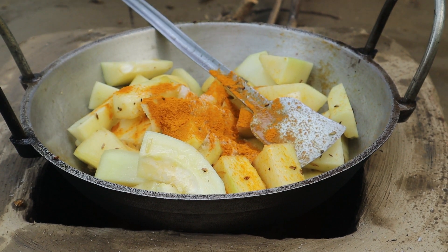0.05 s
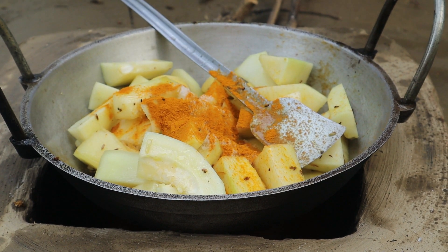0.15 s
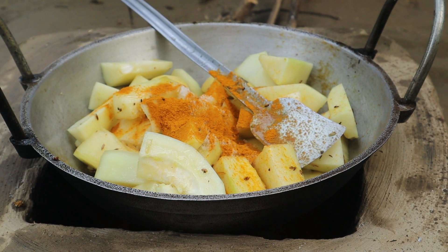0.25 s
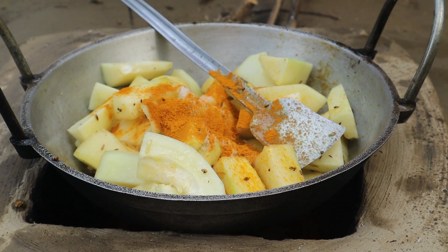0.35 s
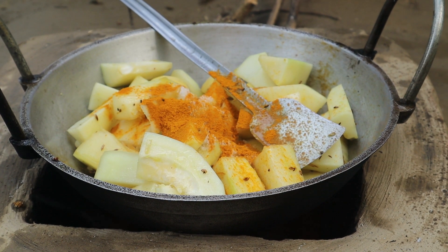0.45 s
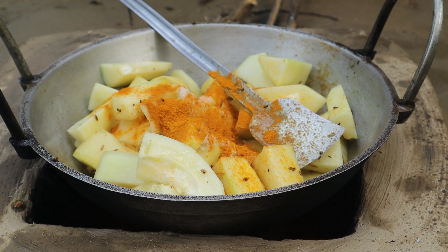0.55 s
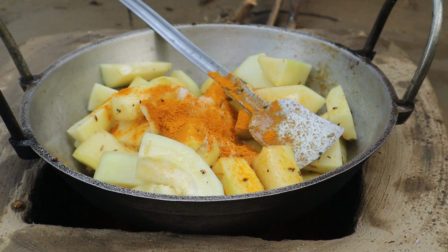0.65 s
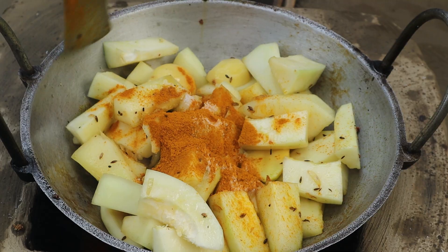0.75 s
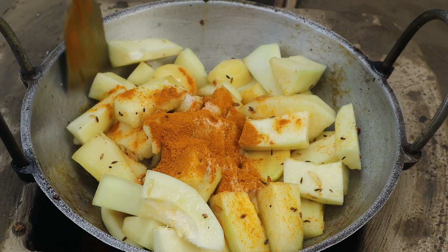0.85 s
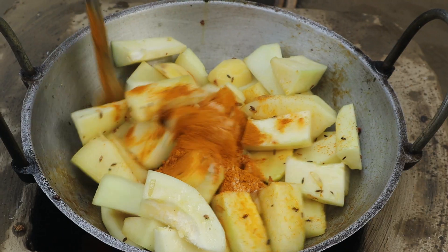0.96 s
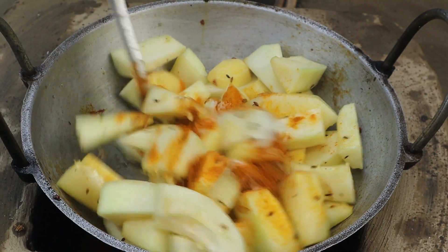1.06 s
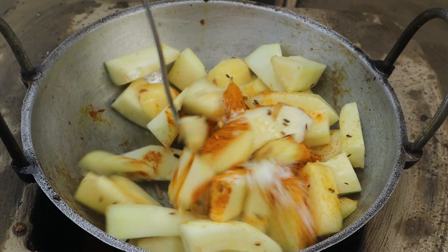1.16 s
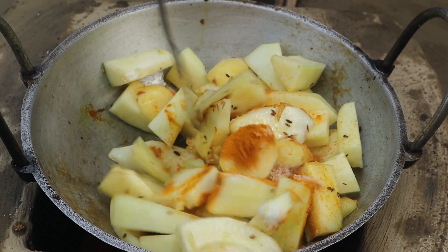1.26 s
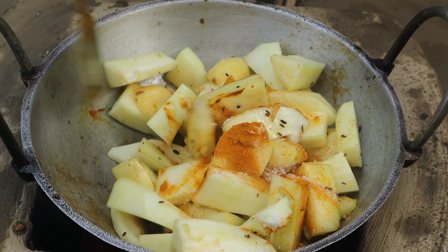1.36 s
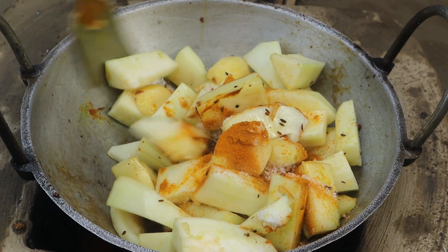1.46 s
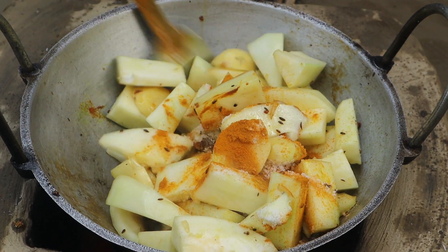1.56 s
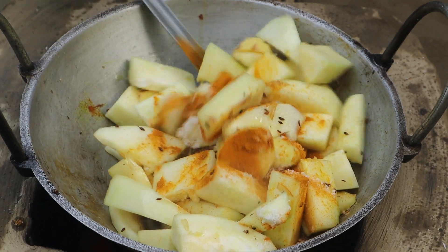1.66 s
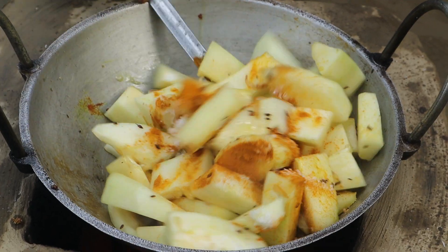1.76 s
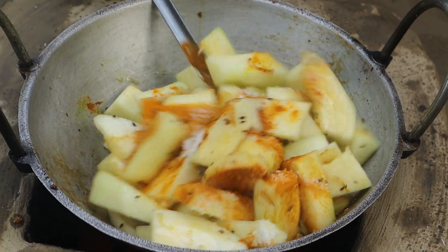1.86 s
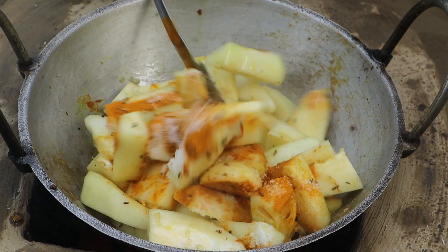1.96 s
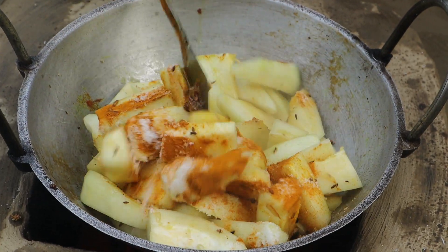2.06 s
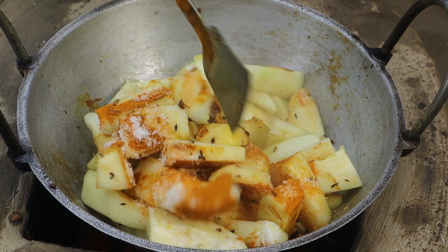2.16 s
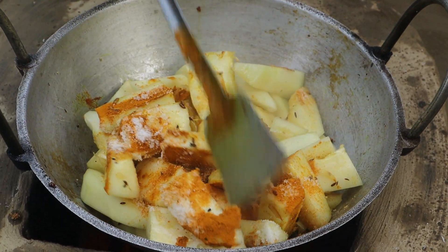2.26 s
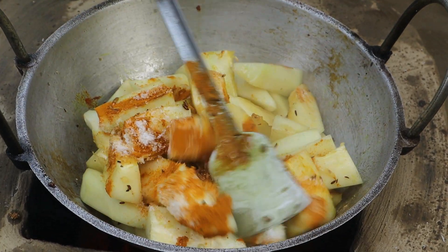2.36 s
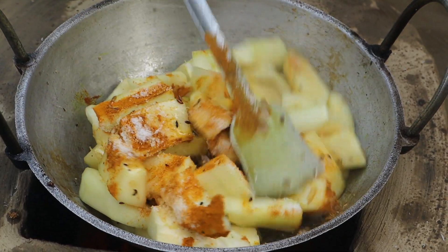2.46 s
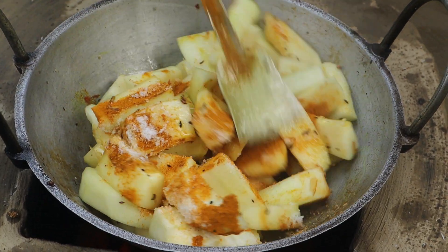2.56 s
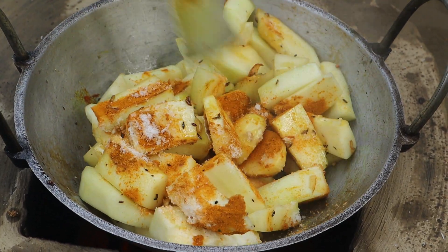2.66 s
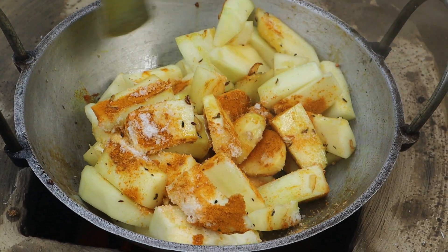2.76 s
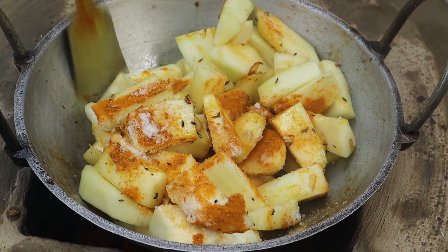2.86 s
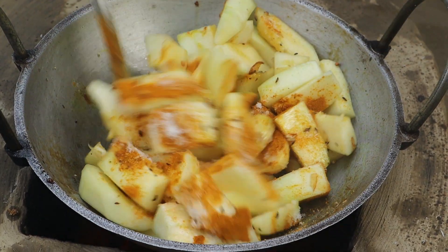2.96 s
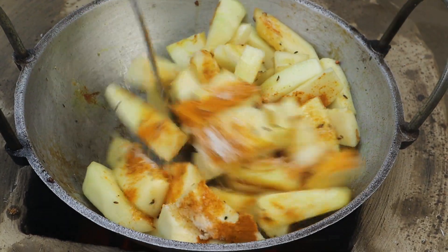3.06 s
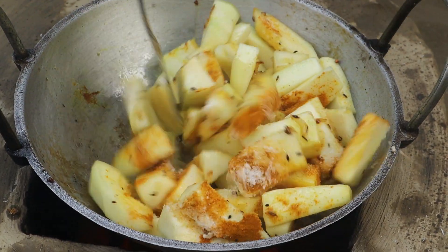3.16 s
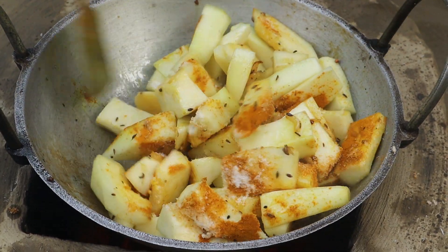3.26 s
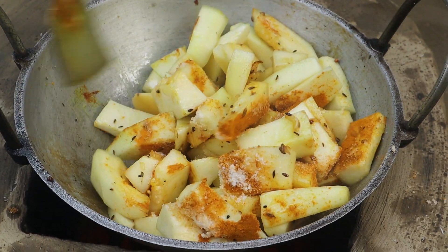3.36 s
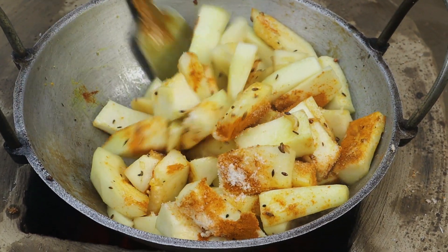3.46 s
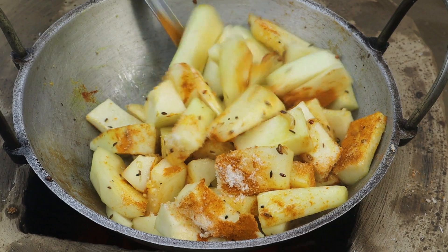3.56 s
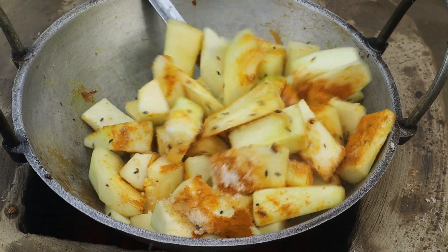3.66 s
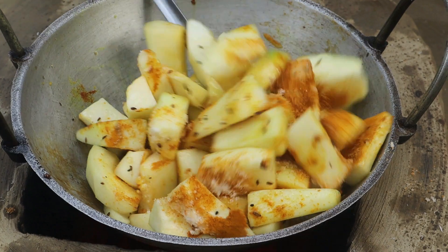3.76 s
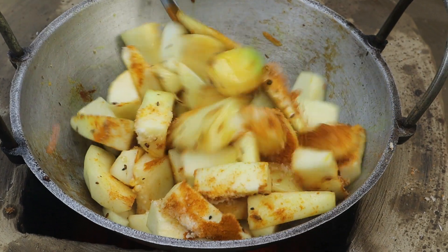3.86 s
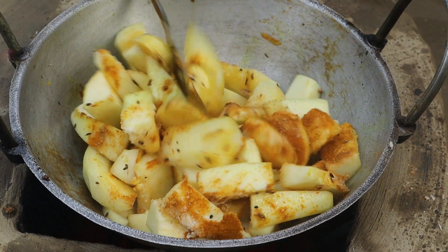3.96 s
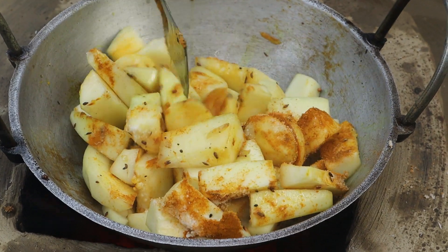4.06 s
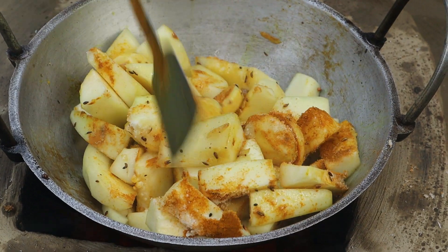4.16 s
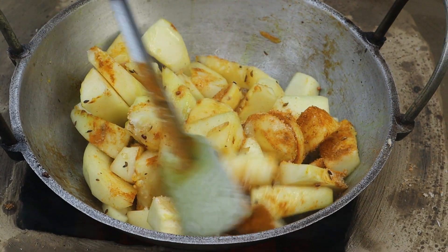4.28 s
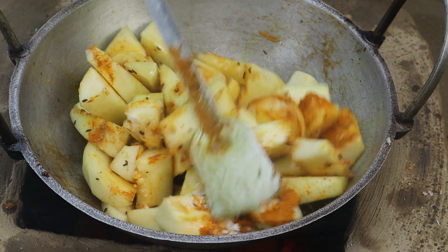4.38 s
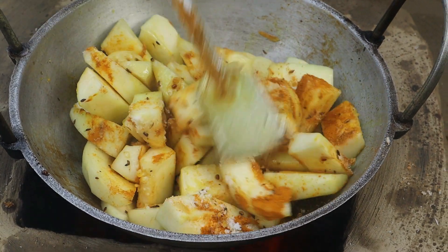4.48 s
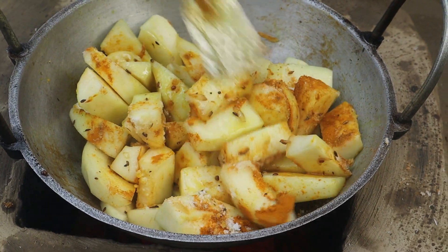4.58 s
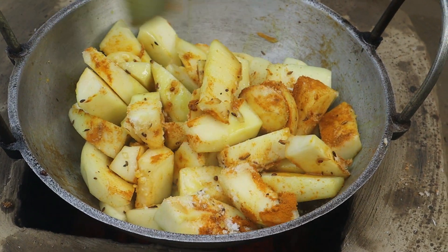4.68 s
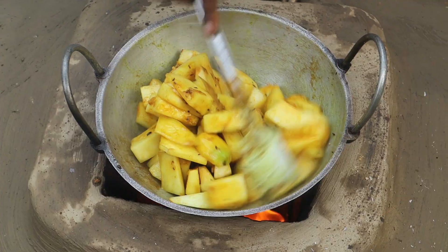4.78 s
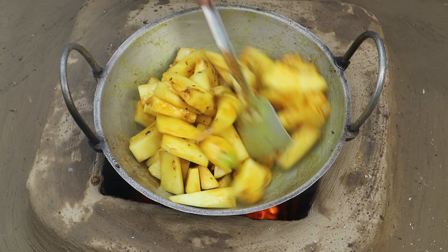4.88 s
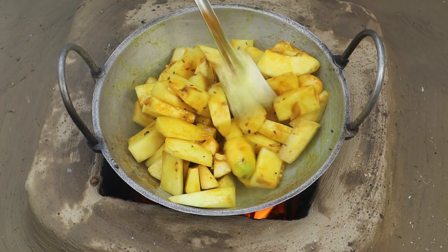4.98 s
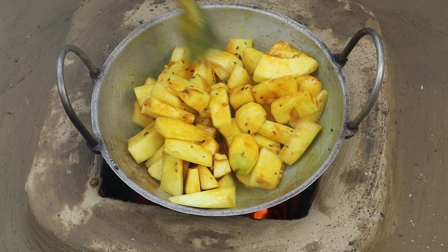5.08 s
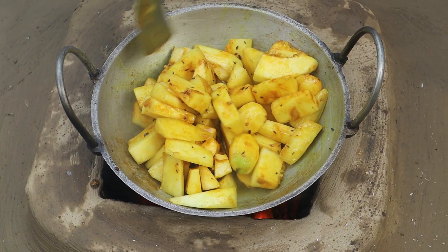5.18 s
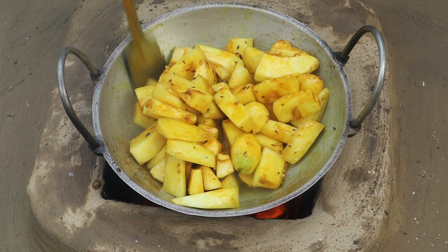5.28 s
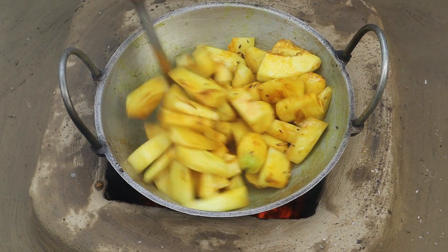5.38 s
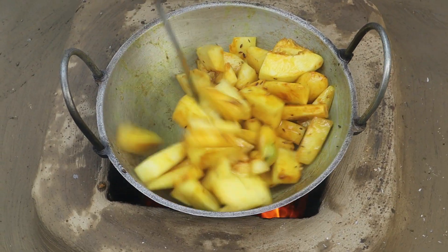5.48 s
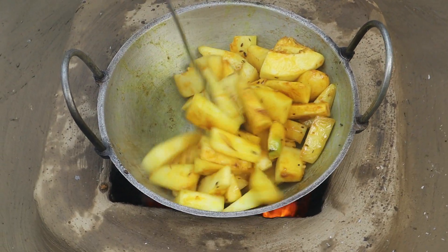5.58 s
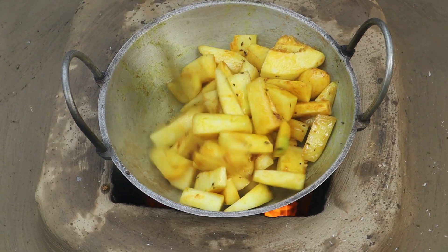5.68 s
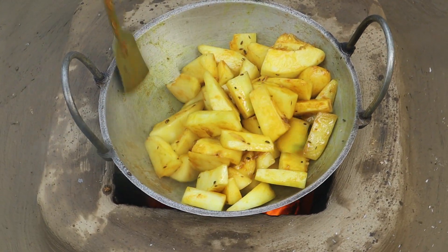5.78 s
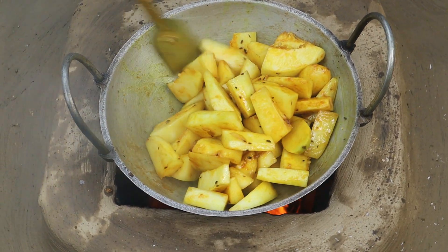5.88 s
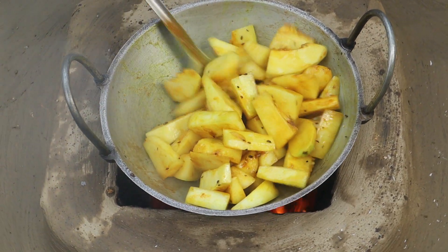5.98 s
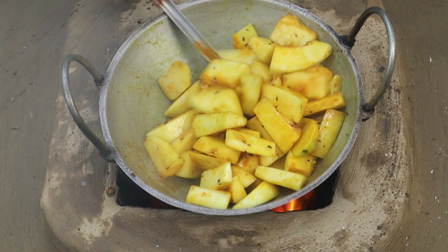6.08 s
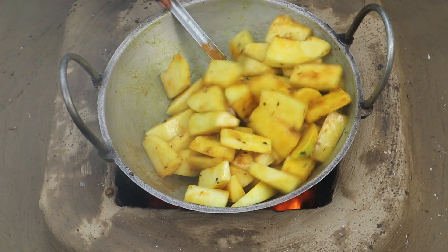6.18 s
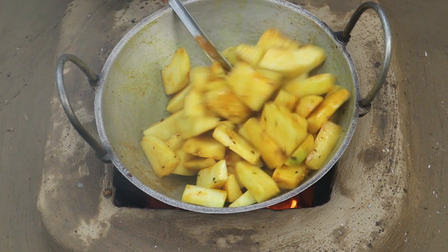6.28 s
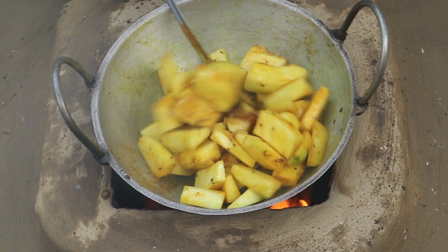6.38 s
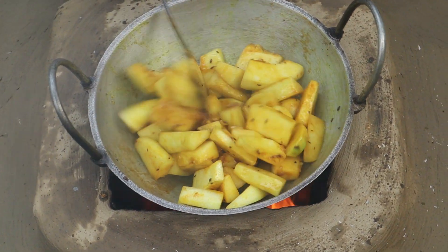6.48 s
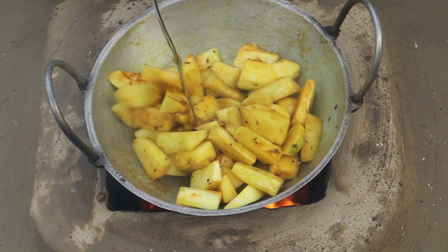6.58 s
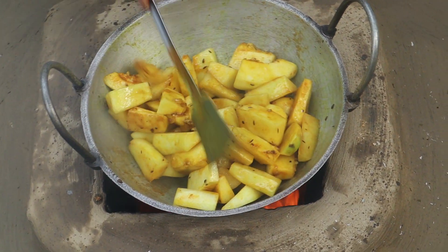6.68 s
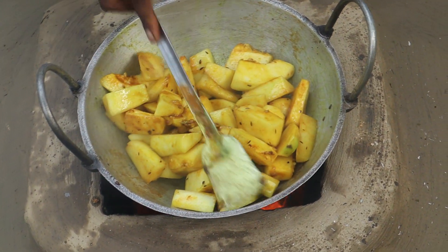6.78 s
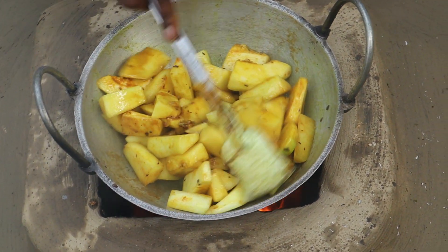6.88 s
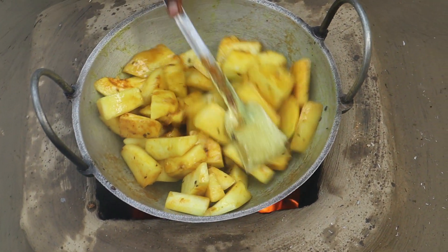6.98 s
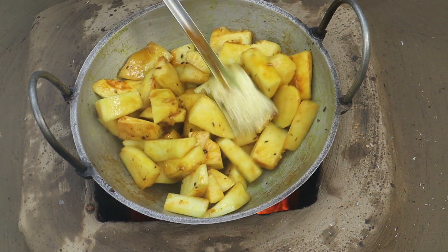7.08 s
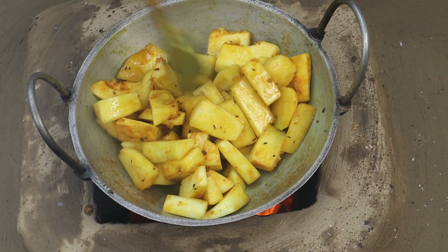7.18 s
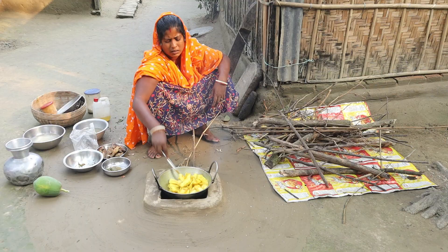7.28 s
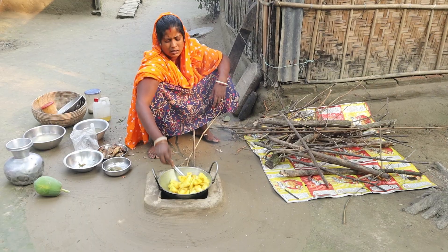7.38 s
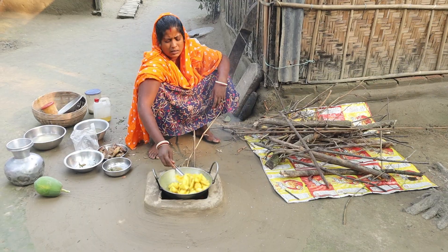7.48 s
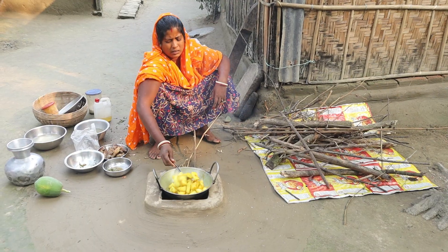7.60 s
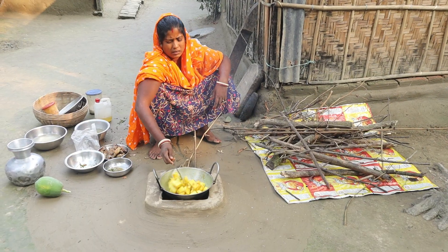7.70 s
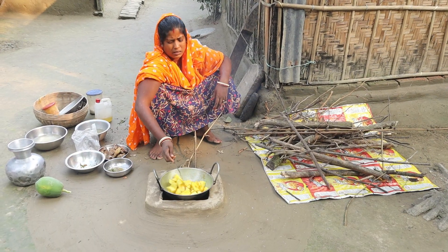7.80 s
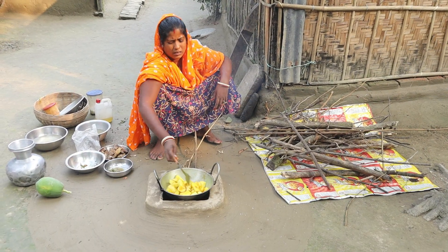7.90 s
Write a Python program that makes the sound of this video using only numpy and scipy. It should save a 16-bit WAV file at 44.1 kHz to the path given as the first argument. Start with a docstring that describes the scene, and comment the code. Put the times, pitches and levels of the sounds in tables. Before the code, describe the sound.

Stereo close microphone outdoors: faint bubbling and popping oil first, then vigorous sizzling with short metallic clacks, gritty blade scrapes and brief squeaks as vegetables are turned in a pan. A quieter lull leads to an even, dense sizzle over low rumble, with dull tumbling and sparse knocks. Finally, a wider position with quieter frying, a single clink and soft distant one-cylinder engine pulses.

```python
"""Vegetable pieces fry in oil in a round metal pan on an outdoor fire, heard from four positions in turn.
From the start, noise bands of steam bubbles seethe over a low rumble, pieces roll and big drops pop as decaying sines.
From about 1 s a spatula knocks, scrapes and squeaks: contact noise rings the pan's modes and narrow bands glide.
Faint sine hums come and go from 2.75 s, rolling pieces groan low at 6.6 s; from 7.4 s a slow one-cylinder engine
thumps far off, a ringing pulse per firing."""
import sys
import numpy as np
from scipy import signal
from scipy.fft import rfft, irfft
from scipy.io import wavfile

SR = 44100
rng = np.random.default_rng(int(sys.argv[2]) if len(sys.argv) > 2 else 0)


def wav_record(signal):
    """Record a signal, one row per channel, as 16-bit PCM in the file named by sys.argv[1]."""
    frames = np.transpose(np.atleast_2d(signal))
    bounded = np.clip(frames, -1, 1)
    # unit amplitude maps onto the largest positive 16-bit level
    quanta = np.round(bounded * 32767).astype(np.int16)
    wavfile.write(sys.argv[1], SR, quanta)


N = 350154


def amp(db):
    """Decibels to gain."""
    return 10 ** (np.asarray(db) / 20)


def rms_one(x):
    """Scale to unit rms."""
    return x / np.sqrt(np.mean(x ** 2) + 1e-20)


def in_time(tables):
    """Columns of successive curve tables, read at every sample."""
    s, *columns = np.transpose(np.vstack(tables))
    return [np.interp(np.arange(N) / SR, s, column) for column in columns]


def at_hz(points, hz):
    """The second column of a spectrum, read on a log-frequency axis."""
    points = np.array(points, float)
    return np.interp(np.log(hz), np.log(np.maximum(points[:, 0], 1)), points[:, 1])


# The start of each listening position, in seconds.
POSITION_STARTS = [0, .803, 4.804, 7.34]


def at_position(values):
    """One value for each listening position, read at every sample."""
    position = np.searchsorted(POSITION_STARTS, np.arange(N) / SR, side="right") - 1
    return np.asarray(values)[position]


def drift(rate_hz):
    """Slow random curve of spread 1: noise through two equal one-pole lowpasses, one point every 40 samples."""
    r = np.exp(-2 * np.pi * rate_hz * 40 / SR)
    noise = rng.standard_normal(N // 40 + 2002)
    slow = signal.lfilter([1], [1, -2 * r, r * r], noise)[2000:]   # skip the filter's start
    return np.interp(np.arange(N) / 40, np.arange(len(slow)), rms_one(slow))


def band_pass(x, low_hz, high_hz, order):
    """Keep one band of a sound."""
    return signal.sosfilt(signal.butter(order, [low_hz, high_hz], "band", fs=SR, output="sos"), x)


def ring(force, hz, t60):
    """A damped resonance: a unit click sets a sine of height 1 ringing."""
    r, w = amp(-60 / (t60 * SR)), 2 * np.pi * hz / SR
    return signal.lfilter([0, np.sin(w)], [1, -2 * r * np.cos(w), r * r], force + 1e-18)


def sides(db):
    """Left and right gains for a left-right difference."""
    return amp(np.multiply.outer([.5, -.5], db))


def favour(hz, centre_hz, octaves):
    """Bell curve over pitch: 1 at the centre, falling off with distance in octaves."""
    return np.exp(-.5 * (np.log2(hz / centre_hz) / octaves) ** 2)


def bursts(per_s, uneven_db):
    """Random clicks of uneven size and either sign; rms 1."""
    sizes = amp(uneven_db * np.minimum(rng.exponential(1, N), 5)) * rng.choice([-1, 1], N)
    return rms_one(sizes * (rng.random(N) < per_s / SR))


SETTLE_S, STIR_FOLLOWS = 0.12, 0.54   # time constant of settling; share of a knock's dB that sets its jolt
HARD_KNOCK_DB, HARD_THUD_DB = -19.5, -17.5   # knocks this hard stir the food fully; weaker ones less


def stirred(knock_db, hard_db):
    """How much the food is moving, 0 to 1: a jolt at each knock, then settling."""
    kicks = np.zeros(N)
    kicks[[round(row[0] * SR) for row in KNOCKS]] = amp(STIR_FOLLOWS * (knock_db - hard_db))
    settling = signal.lfilter([1], [1, -np.exp(-1 / (SETTLE_S * SR))], kicks + 1e-18)
    return np.minimum(settling, 1)


# How the pair of ports hears the frying from close by, then from further off.
# Each row: pitch in Hz, left-right likeness from 0 to 1, phase in radians by which the left leads.
PORTS = [
    [(400, 0.85, 0), (1000, .91, 0.14), (2000, 0.84, 0), (2800, 0.49, 1.1), (4100, 0.37, 0.68),
     (5500, 0.39, 1), (7000, 0.27, 0.3), (8700, 0.52, 0.1), (10000, 0.1, -2.4), (11500, 0.23, -2),
     (14000, 0.4, -4)],
    [(400, 0.87, 0.5), (1000, 0.91, 0.1), (2000, 0.88, -1.4), (2800, 0.46, 0.2), (4100, 0.43, -0.7),
     (5500, 0.58, 0.8), (7000, 0.5, 0.5), (8600, 0.46, -1.3), (10000, 0.17, 0.2), (11500, 0.24, -0.5),
     (14000, .16, -2.1)],
]
# Which of the two holds at each position: 0 close, 1 further off.
FAR = [0, 0, 1, 1]


def port_lead(left):
    """The left port hears each pitch a little early or late, differently from near and far."""
    hz = np.fft.rfftfreq(N, 1 / SR) + 1
    leads = [at_hz(np.array(rows)[:, ::2], hz) for rows in PORTS]
    near, far = [irfft(rfft(left) * np.exp(1j * lead), N) for lead in leads]
    return np.where(at_position(FAR), far, near)


# Level of the frying, one table a position. Each row: time in seconds, sizzle in dB before the final gain,
# lower bubbles above it in dB, treble above it in dB.
FRYING = [
    [(0.0, -39.5, -4, 1), (.09, -47.5, 4, 8), (.18, -42.5, 4, 3.5), (.26, -47.5, 2.5, 7),
     (.4, -38, -3.5, -9.5), (.48, -46, 6, 1.5), (.56, -45.5, 2, 5), (.64, -39, 0.5, 3), (0.8, -42, -2.5, 4)],
    [(0.803, -35.5, 1, 5), (1.0, -34.5, -1.5, 4.5), (1.2, -31.5, -5.5, 1.5), (1.38, -28.5, -3.5, 0),
     (1.55, -31.5, -2, 2.5), (1.75, -23, -8.5, 0), (1.86, -30, -3, 3.5), (1.95, -26.5, -9, -1.5),
     (2.08, -34, 2, 5.5), (2.23, -29.5, -5, -4), (2.33, -30, -3, 2.5), (2.48, -26.5, -5.5, -4.5),
     (2.63, -27, -5, -3), (2.78, -28, 0, -2.5), (2.95, -30.5, -2, 5.5), (3.08, -31, -2, 7),
     (3.16, -34, -1.5, 8), (3.23, -36, -2, 9.5), (3.3, -29, -11, -6), (3.42, -35, 0, -1.5),
     (3.5, -34.5, -0.5, 1), (3.68, -25, -8, 1.5), (3.8, -33.5, -2.5, 6.5), (3.88, -34, -8, 2),
     (3.95, -34.5, -15, -5), (4.05, -39.5, -10.5, 0.5), (4.13, -45.5, -6.5, 5), (4.23, -39, -9.5, 1),
     (4.32, -44, -12, 2), (4.41, -41, -6, -4.5), (4.44, -42, 10, 2), (4.49, -41.5, 4.5, 0),
     (4.58, -34.5, -6.5, -6), (4.72, -37, -12, -7), (4.8, -37, -8, 1)],
    [(4.804, -28.5, -4, 0), (5.12, -28, -6, 0.5), (5.43, -28.5, -6, -0.5), (5.6, -30.5, -3.5, -1.5),
     (6.05, -29.5, -4, 2), (6.3, -30, -4, 4), (6.53, -31, -4.5, 2.5), (6.85, -28, -4.5, 2),
     (7.15, -29.5, -2.5, 3.5), (7.32, -30, -3.5, 1)],
    [(7.34, -30.5, -1, 4), (7.58, -39.5, -0.5, 2), (7.94, -40.5, 2, 2.5)],
]
# Colour of the frying, one table a position. Each row: time in seconds, extra gurgle in dB,
# extra level near BODY_HZ in dB, extra level near HOLLOW_HZ in dB, extra mist in dB.
COLOUR = [
    [(0.0, 2, -4, -.5, -8), (.4, 4, -3.5, 6, -1), (.8, 2, -6, 1, -5.5)],
    [(.803, 0, 0, 0, -2.5), (1.3, 0.5, 0.5, 3, 2.5), (1.7, -3.5, -1.5, -0.5, -0.5), (2.1, -0.5, 2, -2, 0.5),
     (2.45, -5.5, 1, -7, 2), (2.8, 0, -3, -0.5, 4), (3.1, -1.5, -1.5, 1, 1.5), (3.45, -7, -6, -3.5, 5.5),
     (3.65, -0.5, -1.5, 0, -4), (3.85, 0, -5.5, -7, -7.5), (4.1, 3, 4.5, 3, 3), (4.45, 4.5, -2, 2, 5.5),
     (4.8, -1, 0, -4, 0)],
    [(4.804, -2, 0, -2, -0.5), (5.3, -1, 2, -1.5, 1.5), (5.8, -0.5, 1.5, -1, 0.5), (6.3, 1.5, -2, 0.5, 0),
     (6.8, -3, 1.5, -1.5, -3.5), (7.32, 2, 3, 0, 0)],
    [(7.34, -3, -0.5, -5, -12), (7.6, -1, -0.5, 1.5, -5), (7.94, -2.5, -1, 1, -5)],
]
# Pitches that mark the kinds of bubble, in Hz.
BUBBLE_HZ = [1000, 1350, 1800, 3100, 6600, 11500]
# The kind at each of those pitches: 0 gurgle, 1 simmer, 2 sizzle, 3 spit, 4 mist.
BUBBLE_KIND = [0, 1, 1, 2, 3, 4]
# Usual share of each kind in steady frying, in dB.
USUAL_DB = [0.5, 2, 1.5, -0.5, 3]
# Basic spectrum of the frying. Each row: pitch in Hz, relative density in dB.
SIZZLE = [(300, -40), (450, -26), (620, -16), (820, -11.5), (1050, -10), (1250, -7), (1550, -5.5),
          (2000, -4.5), (2600, -4), (3100, -4), (3600, -4.5), (4200, -3.5), (4800, -9), (5700, -8),
          (7000, -9.5), (9000, -11.5), (11600, -9.5), (13000, -16), (15600, -24.5)]
# Stereo lean of the frying by pitch. Each row: pitch in Hz, extra left-right difference in dB.
LEAN = [(400, -0.5), (1000, 3), (2000, -3.5), (4000, -1.5), (8000, 4), (14000, 1)]
# Left-right balance of the frying at each position, in dB.
LEAN_DB = [-2, -1.5, -2.15, -0.5]
BODY_HZ, HOLLOW_HZ = 2240, 2800
GURGLE_FOLLOWS, FULL_BASS_DB = 0.35, -45   # share of the bass swing; bass level from which the swing counts
STIRRED_DB, STIRRED_SIMMER_DB = 7, 2   # rise of gurgle and simmer when fully stirred
FULL_SIZZLE_DB, PATCHIER_PER_DB = -32, 0.1265   # below this sizzle the sound grows patchier, by this share per dB


def bubble_shares():
    """Level of each kind of bubble in dB over time; knocks stir up gurgle and simmer."""
    sizzle_db, simmer_db, treble_db = in_time(FRYING)
    more_gurgle_db, _, _, more_mist_db = in_time(COLOUR)
    moving = stirred(np.transpose(KNOCKS)[1], HARD_KNOCK_DB)
    gurgle_db = GURGLE_FOLLOWS * (in_time(BASS)[0] - FULL_BASS_DB) + STIRRED_DB * moving
    gurgle_db = gurgle_db + 0.5 * simmer_db + more_gurgle_db
    simmer_db = simmer_db + STIRRED_SIMMER_DB * moving
    kinds = [gurgle_db, simmer_db, 0 * sizzle_db, treble_db, treble_db + more_mist_db]
    return np.array(kinds) + np.c_[USUAL_DB]


def frying(fine_per_s, uneven_db, spatter_db, patchy_db, gain_db):
    """Bubbles of each size fill their own narrow band; sparse spatter clicks through all of them."""
    sizzle_db = in_time(FRYING)[0]
    _, body_db, hollow_db, _ = in_time(COLOUR)
    shares = bubble_shares()
    swarms = [bursts(fine_per_s, uneven_db) for swarm in range(3)]
    spatter = amp(spatter_db) * bursts(900, 4.0)
    place = rng.standard_normal(N)      # each bubble bursts somewhere else across the pan
    far = at_position(FAR)
    seething = drift(7.3)               # shared by all bands
    patchy = patchy_db * (1 + PATCHIER_PER_DB * np.maximum(FULL_SIZZLE_DB - sizzle_db, 0))
    out = np.zeros((2, N))
    edges = np.geomspace(420, 16500, num=22)
    for k, (low, high) in enumerate(zip(edges, edges[1:])):
        hz = np.sqrt(low * high)
        clicks = swarms[k % 3] + spatter
        mid, side = band_pass([clicks, clicks * place], low, high, 3)
        alike = np.clip([at_hz(rows, hz) for rows in PORTS], 0, 1)[far]
        # weight of each kind of bubble in this band
        nearness = [at_hz(list(zip(BUBBLE_HZ, own)), hz) for own in np.eye(5)[:, BUBBLE_KIND]]
        db = at_hz(SIZZLE, hz) + nearness @ shares
        db = db + favour(hz, HOLLOW_HZ, 0.12) * hollow_db + favour(hz, BODY_HZ, 0.17) * body_db
        db = db + patchy * (0.5 * seething + drift(15.0)) + 0.47 * drift(1.43)
        pair = np.sqrt(1 + alike) * mid + np.sqrt(1 - alike) * side * [[1], [-1]]
        out += amp(db) * sides(at_hz(LEAN, hz))[:, None] * pair
    return amp(sizzle_db + gain_db) * sides(at_position(LEAN_DB)) * [port_lead(out[0]), out[1]]


# Spectrum of the rumble. Each row: pitch in Hz, relative density in dB.
RUMBLE_COLOUR = [(13, -47), (22, 7), (48, 3.5), (75, 5.5), (129, -1), (183, 3.5), (280, -6.5), (413, -16.5),
                 (600, -7.5), (780, -4.5), (1320, -120)]
# Level of the bass, one table a position; rumble, rolling pieces and gurgle all follow it.
# Each row: time in seconds, relative level in dB, deepest rumble above its usual share in dB.
BASS = [
    [(0.0, -65, -3), (0.4, -69.5, -2), (0.6, -74, -3), (0.8, -77, 0)],
    [(0.803, -47.5, 2), (1.0, -43.5, -4), (1.4, -43.5, -7), (1.8, -44, -16), (2.05, -47, -5),
     (2.4, -68, -5), (2.65, -61, -6), (2.85, -66, -8), (3.0, -53, -1), (3.4, -70, -4), (3.6, -59, -8),
     (3.85, -69, -9), (4.0, -54, -9), (4.2, -85, -5), (4.5, -67, -6), (4.8, -93, 0)],
    [(4.804, -44.5, 0), (5.0, -46, 7), (5.2, -46, 3), (5.6, -44.5, -2), (6.16, -43, -1), (6.35, -45.5, 1),
     (6.65, -44, 2), (7.32, -49, 4)],
    [(7.34, -42.5, 2), (7.94, -47.5, 4)],
]
DEEP_HZ = 72   # below this the rumble is the deepest


def rumble(lumpy_db):
    """Low noise of the fire and the surroundings, less alike on the two sides as pitch rises."""
    hz = np.fft.rfftfreq(N, 1 / SR)
    colour = amp(at_hz(RUMBLE_COLOUR, hz + 1))
    mid, side = irfft(rfft(rng.standard_normal((2, N))) * colour, N)
    rising_side = signal.lfilter([1, -1], 1, rms_one(side))   # a difference favours higher pitches
    low = rms_one(mid) + amp(12.0) * rising_side * [[1], [-1]]
    bass_db, deep_db = in_time(BASS)
    deep = signal.sosfiltfilt(signal.butter(2, DEEP_HZ, fs=SR, output="sos"), low)
    return amp(bass_db + lumpy_db * drift(3.7)) * (low - deep + amp(deep_db) * deep)


# Pieces rolling on the bowl under full bass, before any stirring: level at each position, in dB.
TUMBLING_DB = [-68, -57, -56.5, -60]
TUMBLING_FOLLOWS, ROLLING_DB = 0.79, 13   # share of the bass swing; rise of the rolling after a hard thud


def tumbling():
    """Soft pieces bump the bowl in loose clusters: dull thuds in a narrow low band."""
    bumps = bursts(2000, 2.9) * (1 + 0.6 * rng.standard_normal((2, N)))
    dull = band_pass(bumps, 220, 480, 3)
    db = at_position(TUMBLING_DB) + TUMBLING_FOLLOWS * (in_time(BASS)[0] - FULL_BASS_DB)
    db = db + ROLLING_DB * stirred(np.transpose(KNOCKS)[4], HARD_THUD_DB)
    return amp(db) * rms_one(dull)


# Big drops bursting. Each row: time in seconds, peak in dB before the band filter, pitch in Hz,
# left-right difference in dB.
POPS = [(.0255, -21.5, 6800, 0), (.04, -30, 4000, 0), (.087, -29, 3660, -2), (.108, -32, 1490, -2),
        (.1675, -28, 2600, -3), (.19, -27, 2300, -5), (.208, -25, 5300, 0), (.3165, -23.5, 2900, -7),
        (.3516, -23, 2820, -4.5), (.3765, -21, 2110, -7), (.424, -25, 4070, -4), (.4582, -28, 1700, -2),
        (.478, -24, 2050, -6), (.503, -17, 9550, 13), (.507, -27, 3300, 0), (.58, -27, 4020, 0),
        (.596, -23, 7300, 3), (.602, -24, 3950, -1), (.6217, -25, 3500, -1), (.6655, -27, 3630, -2),
        (.6872, -23, 3500, -1), (.69, -27, 2600, -2), (.6905, -32.5, 1400, -2), (1.195, -19, 4350, -1),
        (1.215, -19, 1760, -2), (1.362, -18, 3100, -4), (1.4209, -4, 11500, 2), (1.858, -13, 4250, -2),
        (1.8888, -22, 3300, -3), (1.897, -15, 9500, 1), (1.9178, -16, 3700, 0), (1.983, -15, 7500, -1),
        (2.003, -23, 3900, -1), (2.0503, -9, 11500, -2), (2.055, -8, 8000, 0), (2.0656, -11, 6040, -1),
        (2.0658, -3, 11800, -1), (2.088, -23, 3000, -1), (2.1255, -20, 3800, -3), (2.1487, -21, 4030, -1),
        (2.1878, -12, 8500, -6), (2.206, -17, 8000, -1), (2.224, -18, 12000, -2), (2.2411, -11, 8000, -4),
        (2.249, -16, 3000, -2), (2.265, -23, 11000, -2), (2.284, -14, 8000, -1), (2.31, -8, 9130, -4),
        (2.32, -17, 11000, -2), (2.3315, -10, 9000, -1), (2.3492, -6, 10770, -5), (2.4505, -15, 4180, -3),
        (2.5545, -20, 2200, -3), (2.6, -19, 2820, -2), (2.77, -10, 3730, -2), (2.8316, -10.5, 7800, 1),
        (3.1277, -14, 8400, -1), (3.1346, -5, 10000, -1), (3.1395, -14, 10000, 2), (3.1465, -15, 9000, 0),
        (3.16, -14, 6500, 0), (3.1732, -13, 10000, 0), (3.1755, -10, 10500, 0), (3.178, -18, 6000, -1),
        (3.1888, -9, 8500, -1), (3.2127, -7, 8000, -1), (3.228, -16, 10500, 0), (3.2325, -10, 10000, 0),
        (3.262, -17, 9000, 0), (3.276, -16, 3480, -4), (3.281, -19, 10500, 0), (3.293, -24, 3800, 0),
        (3.33, -25, 3650, -3), (3.569, -7, 10000, 0), (3.59, -15, 11500, 0), (3.598, -7, 11500, 0),
        (3.671, -17, 3500, 0), (3.772, -20, 11000, 0), (3.8007, -19, 3700, -2), (4.012, -35, 1600, -2),
        (4.196, -30, 2600, -2), (4.21, -25, 2700, -2), (4.233, -32, 2850, -2), (4.282, -36, 2900, -2),
        (4.315, -31, 2800, -2), (4.598, -27, 2680, -3), (4.618, -25, 3340, 0)]
# Chance drops per second at each position.
SMALL_POPS_PER_S = [25, 8, 3, 6]
SMALL_POP_DB = 1   # the strongest chance drop above the sizzle table; others reach down 10 dB below it
POP_CYCLES, SMALL_POP_CYCLES = 5, 6.2   # ringing length of drops up to POP_HZ
POP_HZ, POP_SHORTENING = 3500, .85   # above this pitch drops ring ever fewer cycles, by this power


def pops():
    """Each big drop is a click that rings a few cycles; smaller bubbles come by chance and ring longer."""
    when, keep, size, pitch, place = rng.random((240, 5)).T
    at = (when * N).astype(int)
    small_db = in_time(FRYING)[0][at] + SMALL_POP_DB - 10 * size
    small = np.c_[at / SR, small_db, 1300 * 7.5 ** pitch, 8 * place - 6]
    small = small[keep < at_position(SMALL_POPS_PER_S)[at] * N / SR / len(at)]
    out, t = np.zeros((2, N + 600)), np.arange(600) / SR
    for rows, most in (POPS, POP_CYCLES), (small, SMALL_POP_CYCLES):
        for s, db, hz, lean_db in rows:
            cycles = most * min(POP_HZ / hz, 1) ** POP_SHORTENING
            swell = np.exp(-t * hz * 2 / cycles) * np.tanh(t * hz * 9 / cycles)
            wave = np.sin(2 * np.pi * hz * t) * swell
            out[:, round(s * SR):][:, :600] += amp(db) * sides(lean_db)[:, None] * wave / np.abs(wave).max()
    return band_pass(out[:, :N], 900, 14000, 3)   # too small for bass


def contact_force(contact, shake):
    """A first touch, then chatter for as long as the contact lasts."""
    t = np.arange(len(shake)) / SR
    fading = np.exp(-(t / max(contact, .0005)) ** 3)
    return 0.29 * (t == 0) + shake * fading / np.sqrt(np.sum(fading ** 2))


# Blade sliding over the metal. Each row: hardest moment in seconds, build-up in seconds, easing in seconds,
# drive in dB, favoured pitch at start in Hz, at end in Hz, bowl rasp in dB, blade rasp in dB.
SCRAPES = [(1.055, 0.019, 0.033, -33, 3520, 5000, -43, -31),
           (1.145, 0.067, 0.059, -28.5, 3000, 2550, -38, -30.5),
           (1.735, 0.098, .05, -29, 3400, 3400, -34.5, -27.5),
           (3.035, 0.069, 0.083, -28.5, 3500, 3600, -38.5, -28.5),
           (3.53, 0.025, 0.089, -44, 2200, 2200, -33.5, -34),
           (3.635, 0.025, 0.147, -35, 4100, 3500, -32.5, -31),
           (5.45, 0.07, 0.044, -30, 3290, 3400, -37, -32),
           (6.088, 0.032, 0.046, -31, 3800, 3500, -35, -27.5)]
PRESS_RISE_DB, PRESS_FALL_DB = 0.5, 1   # pressure builds to its hardest moment, then eases


def stroke_force(hz, grit):
    """Grit under the sliding blade, as one mode feels it."""
    force = np.zeros(N)
    for hardest, build, easing, db, from_hz, to_hz, bowl_db, blade_db in SCRAPES:
        start, end = hardest - build, hardest + easing
        at = np.arange(round(start * SR), round(end * SR))
        pressure = amp(np.interp(at / SR, [start, hardest, end], [-PRESS_RISE_DB, 0, -PRESS_FALL_DB]))
        reach = amp(db) * favour(hz, np.geomspace(from_hz, to_hz, len(at)), 0.2)
        reach += amp(bowl_db) * favour(hz, 1520, 0.24) + amp(blade_db) * favour(hz, 6000, 0.22)
        force[at] += pressure * reach * grit[at] * signal.windows.tukey(len(at), .3)
    return force


# Ringing modes of pan and blade. Each row: pitch in Hz, relative level in dB, 60 dB decay time in seconds.
PAN = [(187, -4, 0.13), (235, 7.5, 0.027), (340, -3.5, 0.063), (500, -5, 0.04), (616, -12, 0.0071),
       (775, -1, 0.043), (887, -17, 0.068), (1044, -9, 0.045), (1255, 4.5, 0.014), (1289, -7.5, 0.052),
       (1490, -3, 0.039), (1710, -23, 0.015), (1865, 4, 0.022), (2030, 2.5, 0.028), (2320, -6, 0.055),
       (2700, -1, 0.012), (3010, -6, 0.028), (3300, -2, 0.021), (3600, -1.5, 0.028), (3950, 1.5, 0.014),
       (5050, -8, 0.029), (5380, 0, 0.024), (5900, -4.5, 0.017), (6330, -3.5, 0.038), (6900, -4.5, 0.021),
       (7120, -3.5, 0.031), (8160, 1.5, 0.016), (8930, -4, 0.019), (10000, -15, .012), (10400, -5, 0.012),
       (11800, 4, 0.0077)]
# Blade on pan. Each row: time in seconds, drive of bowl in dB, of wall in dB, of blade in dB, of thud in dB,
# favoured pitch in Hz, contact time in seconds, left-right difference in dB.
KNOCKS = [(0.933, -30, -31, -24, -34, 7170, 0.0064, 4), (1.021, -25.5, -40, -32, -41, 6370, 0.0089, -1),
          (1.056, -52, -33, -25, -41, 3980, 0.0054, 13), (1.092, -48, -40, -36, -24.5, 700, .004, 0),
          (1.542, -29, -26, -20.5, -37, 6330, 0.0032, 3), (1.597, -29, -34, -40, -52, 1160, .006, -2),
          (1.773, -34, -40, -40, -40.5, 235, .005, -2), (1.791, -18, -28, -24, -24.5, 1060, 0.009, -2),
          (1.8233, -16.5, -13, -15.5, -36, 3010, 0.0026, -3.5), (2.023, -35, -30, -40, -34, 190, 0.0058, 0),
          (2.968, -47, -22, -17.5, -48, 3950, 0.00071, -8),
          (2.972, -24.5, -26.5, -18, -26.5, 775, 0.011, -1.5), (3.014, -39, -40, -40, -43, 1255, .004, 0),
          (3.2, -53, -55, -50, -55, 500, .003, 0), (3.236, -54, -55, -50, -51, 500, .003, 0),
          (3.269, -54, -55, -50, -55, 340, 0.0031, 0), (3.331, -56, -50, -50, -57, 500, 0.0035, 0),
          (3.446, -34, -52, -26, -73, 6900, 0.0022, -5), (3.51, -55, -45, -45, -62, 235, 0.0034, 0),
          (3.561, -46, -40, -45, -46, 340, 0.0057, 2), (3.586, -41, -45, -45, -50, 700, .005, 0),
          (3.656, -32, -38, -41, -44, 3600, 0.005, 3), (3.7344, -17.5, -21, -18, -44, 2360, 0.0028, -4),
          (3.758, -45, -45, -45, -49, 194, .004, 1), (3.983, -33, -54, -53, -38, 900, 0.0096, -2),
          (4.177, -59, -35, -55, -71, 2320, .004, -4), (4.4158, -14.5, -19, -43, -55, 2050, 0.012, -4.5),
          (4.812, -35.5, -26, -26, -37, 1250, 0.0087, -2), (5.156, -32, -36, -38, -42, 1100, 0.0015, 0),
          (5.17, -40, -38, -36, -32, 620, 0.0043, 14), (5.365, -42, -45, -45, -37, 500, .004, 0),
          (5.463, -45, -45, -45, -36.5, 190, .004, 0), (5.616, -58, -35, -36, -33.5, 500, .005, -1),
          (5.92, -47, -45, -45, -45, 235, .004, 0), (6.125, -19, -39, -36, -24, 854, 0.0043, 1),
          (6.209, -25, -30, -36, -27, 1140, 0.0032, -3), (6.454, -40, -39, -34, -29.5, 500, 0.0043, 0),
          (6.610, -32.5, -47, -42, -32, 285, 0.0051, -3), (7.5263, -30, -20.5, -23.5, -33, 3010, 0.0016, 4)]
# Where thud, bowl, wall and blade ring, in Hz.
PART_HZ = [400, 1000, 2400, 3500]
# Toneless bands of bowl, wall and blade. Each row: low edge in Hz, high edge in Hz.
CLACK_BANDS = [(680, 2300), (1500, 3040), (2900, 8000)]
# Centres of the bands in which the grit is heard without a tone, in Hz.
RASP_HZ = [1230, 2050, 2600, 3700, 6560]
RASP_DB = 5.5
NOTE_DB = 1.5   # clack round the favoured pitch of a knock, above its neighbourhood


def clacks(touches, clack_db):
    """Countless damped modes answer each knock with toneless bands of contact noise."""
    out = np.zeros((2, N + 1500))
    for (s, *part_db, thud_db, centre_hz, contact, lean_db), touch in zip(KNOCKS, touches):
        note_db = at_hz(list(zip(PART_HZ[1:], part_db)), centre_hz) + NOTE_DB
        note_band = (0.834 * centre_hz, 1.163 * centre_hz)
        for db, (low, high) in [*zip(part_db, CLACK_BANDS), (note_db, note_band)]:
            clack = band_pass(touch, low, high, 4)
            clack = amp(db + clack_db) * clack / np.abs(clack).max()
            out[:, round(s * SR):][:, :1500] += sides(lean_db)[:, None] * clack
    return out[:, :N]


def spatula(grit_per_s, clack_db):
    """Knocks and the grit of scrapes drive the same modes of pan and blade, over clack and toneless rasp."""
    shakes = rng.standard_normal((len(KNOCKS), 1500))
    touches = [contact_force(row[6], shake) for row, shake in zip(KNOCKS, shakes)]
    grit = bursts(grit_per_s, 3.0)
    out = clacks(touches, clack_db)
    for hz in RASP_HZ:
        rasp = band_pass(stroke_force(hz, grit) + 1e-18, .8 * hz, 1.25 * hz, 2)
        out += amp(RASP_DB + 3.0 * drift(50)) * rasp
    for hz, mode_db, t60 in PAN:
        # the division evens out long and short rings under steady rubbing
        rubbing = stroke_force(hz, grit) * amp(1.57 * drift(28.0)) / np.sqrt(t60 * SR / 9)
        force = np.pad(rubbing * sides(-2.1)[:, None], [(0, 0), (0, 1500)])
        for (s, bowl_db, wall_db, blade_db, thud_db, centre_hz, _, lean_db), touch in zip(KNOCKS, touches):
            db = at_hz(list(zip(PART_HZ, [thud_db, bowl_db, wall_db, blade_db])), hz)
            # where the blade touches decides which modes answer best
            db = db + 7.1 * favour(hz, centre_hz, 0.078)
            if hz < 800:    # the bowl as a whole takes one clean push, heard alike on both sides
                force[:, round(s * SR)] += amp(db)
            else:
                force[:, round(s * SR):][:, :1500] += amp(db) * touch * sides(lean_db)[:, None]
        rung = amp(mode_db) * ring(force[:, :N], hz, t60)
        out += band_pass(rung, .6 * hz, 1.5 * hz, 2)   # a mode radiates little far from its pitch
    return out


# Narrow gliding bands: squeaks of the blade, and last a low groan of pieces rolling.
# Each row: start in seconds, end in seconds, pitch at start in Hz, at end in Hz, width in Hz, level in dB,
# left-right difference in dB.
GLIDES = [(1.018, 1.044, 6450, 6500, 200, -33, 0), (1.025, 1.069, 3400, 4100, 300, -38, 0),
          (1.03, 1.074, 1160, 1300, 150, -36, 0), (1.1, 1.162, 6560, 6230, 300, -34, 9),
          (1.108, 1.152, 2324, 2620, 300, -34, -13), (1.127, 1.183, 1597, 1957, 300, -29.5, -7),
          (1.152, 1.175, 3600, 3860, 300, -29, -4), (1.752, 1.808, 7000, 7000, 250, -31, 2),
          (1.748, 1.767, 3300, 3510, 350, -31, -2), (1.802, 1.82, 1980, 2150, 200, -30, -7),
          (3.017, 3.034, 3720, 3900, 700, -29, 0), (3.082, 3.127, 1710, 1654, 350, -32.5, -3),
          (3.038, 3.056, 5880, 6330, 900, -21.5, 6), (3.445, 3.452, 6750, 6900, 900, -24, -10),
          (3.452, 3.475, 6900, 7200, 700, -32, -4), (3.51, 3.575, 6500, 6800, 500, -36, -4),
          (3.503, 3.578, 1351, 1160, 347, -31.5, -4), (3.535, 3.576, 2195, 2000, 250, -37, -13),
          (3.608, 3.651, 3900, 4050, 250, -29, -2), (3.61, 3.637, 5850, 5950, 200, -33, -2),
          (3.679, 3.737, 1268, 1540, 400, -32.5, 1), (4.17, 4.359, 2500, 2900, 600, -48.5, -13),
          (4.429, 4.506, 1306, 2190, 1570, -43, -2.5), (4.51, 4.6, 3300, 3900, 700, -37, 1),
          (5.365, 5.398, 3400, 3950, 350, -34, -4), (5.428, 5.476, 7200, 6230, 350, -33, -2),
          (6.074, 6.11, 1797, 1865, 200, -28, -6), (6.066, 6.106, 4050, 3450, 350, -32, -5),
          (6.615, 6.761, 383, 333, 220, -45, 0)]


def squeaks_and_groan(judder_db):
    """Each squeak, and the groan, is a narrow band of noise that glides in pitch and judders in level."""
    out, judder = np.zeros((2, N)), amp(judder_db * drift(60))
    for start, end, from_hz, to_hz, width_hz, db, lean_db in GLIDES:
        at = np.arange(round(start * SR), round(end * SR))
        noise = rng.standard_normal((2, 12000))
        narrow = signal.butter(2, width_hz / 2, fs=SR, output="sos")
        wobble = signal.sosfilt(narrow, noise)[:, -len(at):]
        turn = 2 * np.pi * np.cumsum(np.geomspace(from_hz, to_hz, len(at))) / SR
        note = rms_one(judder[at] * (wobble[0] * np.cos(turn) + wobble[1] * np.sin(turn)))
        out[:, at] += amp(db) * sides(lean_db)[:, None] * note * signal.windows.tukey(len(at), .4)
    return out


# Faint short hums. Each row: start in seconds, length in seconds, pitch in Hz, peak level in dB.
HUMS = [(2.759, .075, 396, -48), (2.75, 0.063, 688, -47), (4.863, .07, 315, -44), (6.945, .05, 575, -49),
        (7.03, .155, 575, -47), (7.195, .085, 572, -48)]


def hums():
    """Soft sines of steady pitch that swell and fade."""
    out = np.zeros(N)
    for s, length, hz, db in HUMS:
        t = np.arange(round(length * SR)) / SR
        swell = signal.windows.tukey(len(t), .6)
        out[round(s * SR):][:len(t)] += amp(db) * np.sin(2 * np.pi * hz * t) * swell
    return out


# Resonances of the exhaust pipe. Each row: pitch in Hz, level at the last firing in dB,
# 60 dB decay time in seconds.
EXHAUST = [(69, -34, 0.3), (108.5, -23, 0.071), (166, -42, .03)]
ENGINE_START_S, ENGINE_PERIOD_S = 7.379, .0861


def engine():
    """One soft exhaust pulse per firing, ringing in the pipe."""
    firings = np.arange(ENGINE_START_S, N / SR, ENGINE_PERIOD_S)
    force = np.zeros(N)
    force[(firings * SR).astype(int)] = amp(9.8 * (firings - firings[-1]))   # grows by 9.8 dB per second
    return sum(amp(db) * ring(force, hz, t60) for hz, db, t60 in EXHAUST)


def scene():
    """All sources in the open air."""
    oil = frying(fine_per_s=9000, uneven_db=3.0, spatter_db=-13.0, patchy_db=1.14, gain_db=9.5) + pops()
    pan = spatula(grit_per_s=1600, clack_db=-1.5) + squeaks_and_groan(judder_db=2.0) + tumbling()
    return oil + pan + rumble(lumpy_db=1.5) + hums() + engine()


def record(dry):
    """The microphone sheds the lowest bass, peaks beyond full scale clip, the top is cut."""
    heard = signal.sosfilt(signal.butter(2, 55, "high", fs=SR, output="sos"), dry)
    top_cut = signal.cheby2(14, 70, 15850, fs=SR, output="sos")   # 70 dB down from 15850 Hz
    return signal.sosfilt(top_cut, np.clip(heard, -1, 1))


dry = scene()
out = record(dry)
wav_record(out)
```